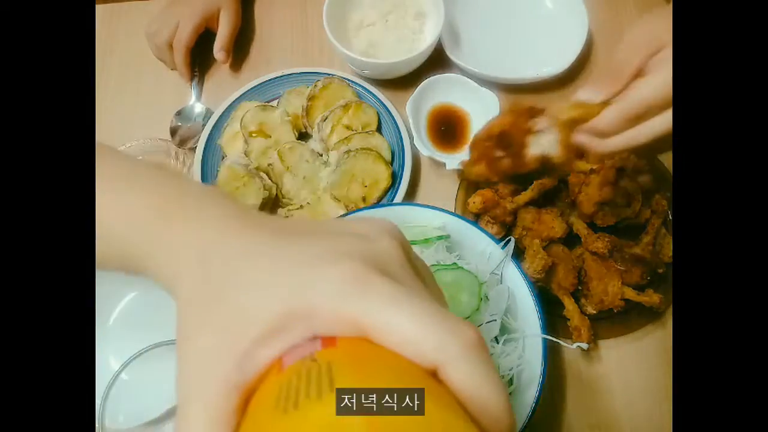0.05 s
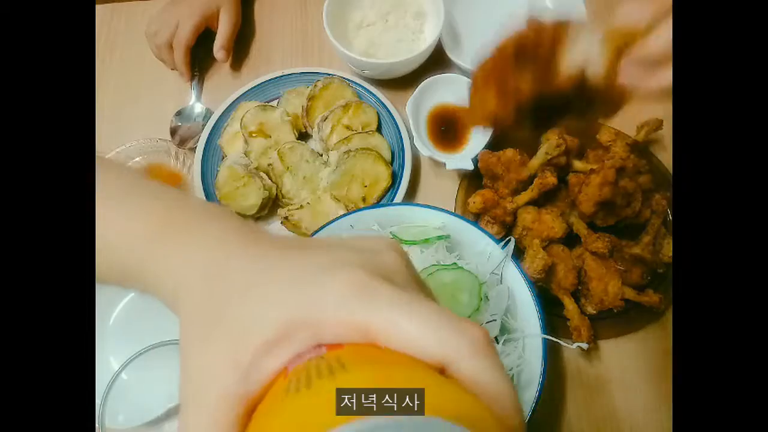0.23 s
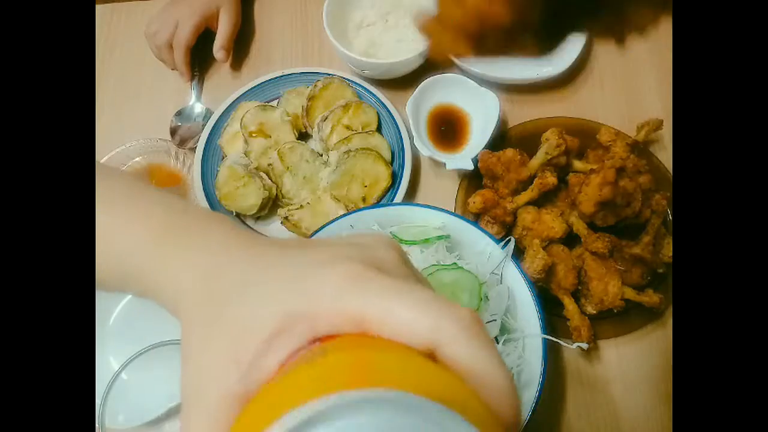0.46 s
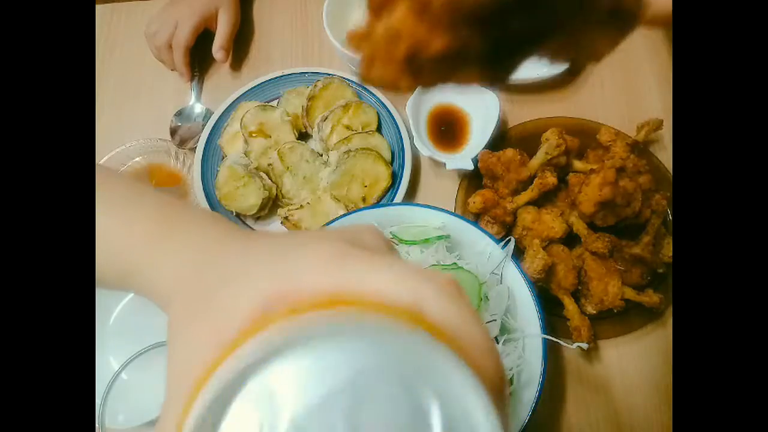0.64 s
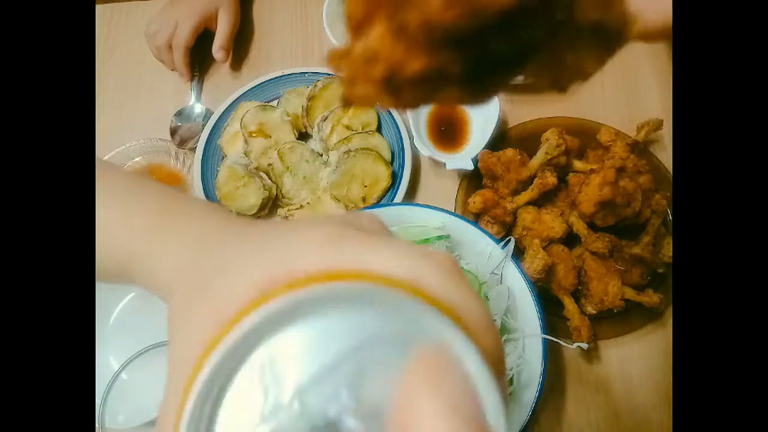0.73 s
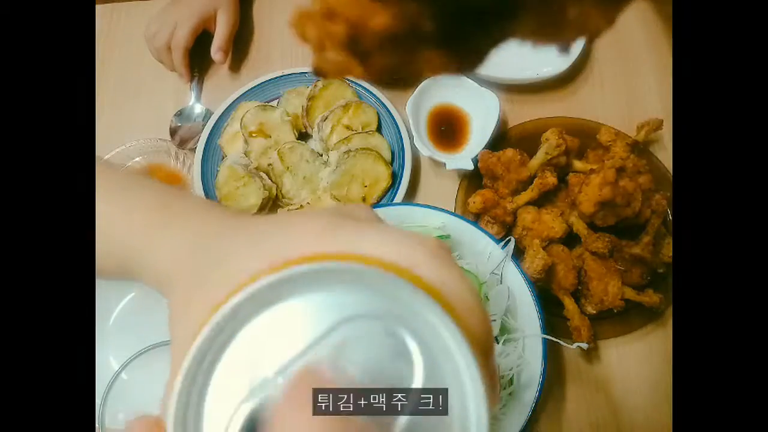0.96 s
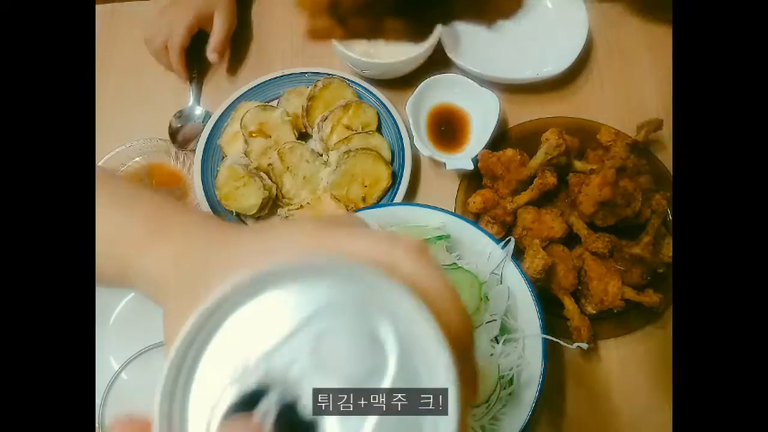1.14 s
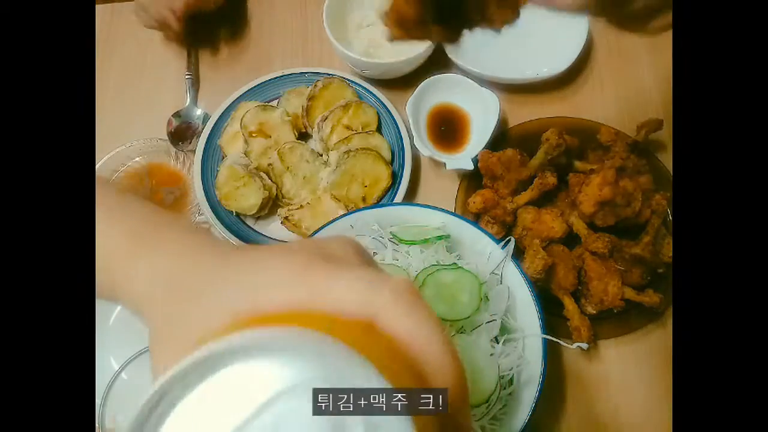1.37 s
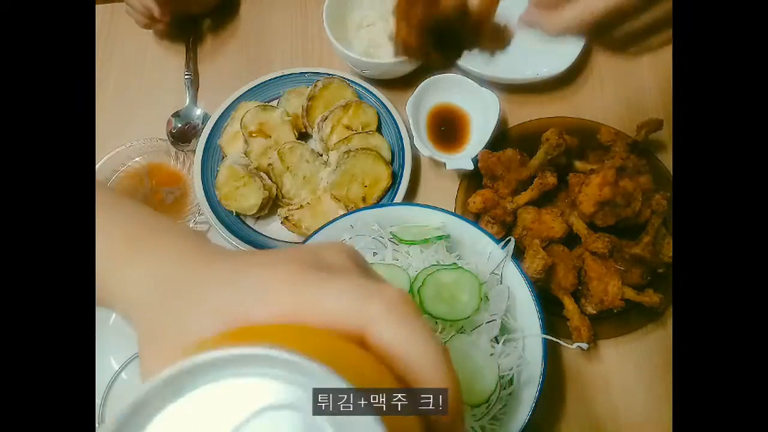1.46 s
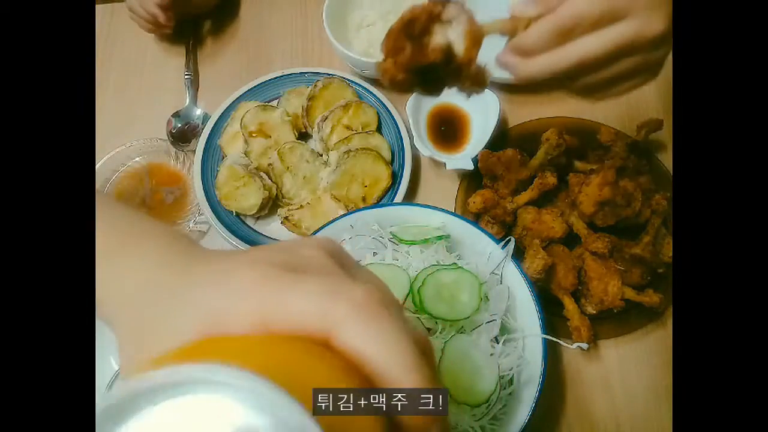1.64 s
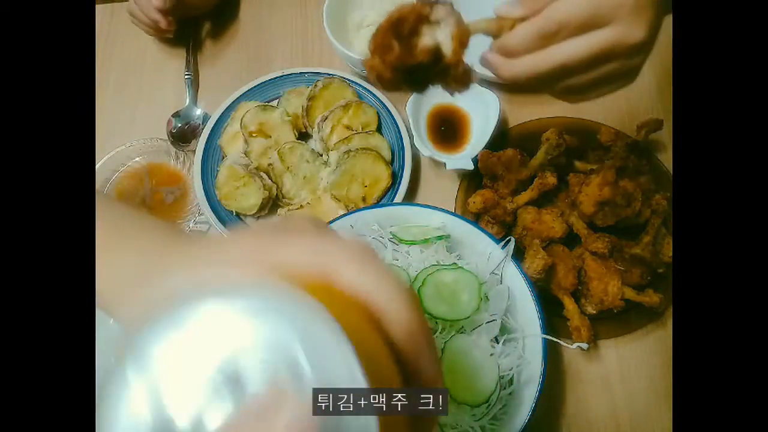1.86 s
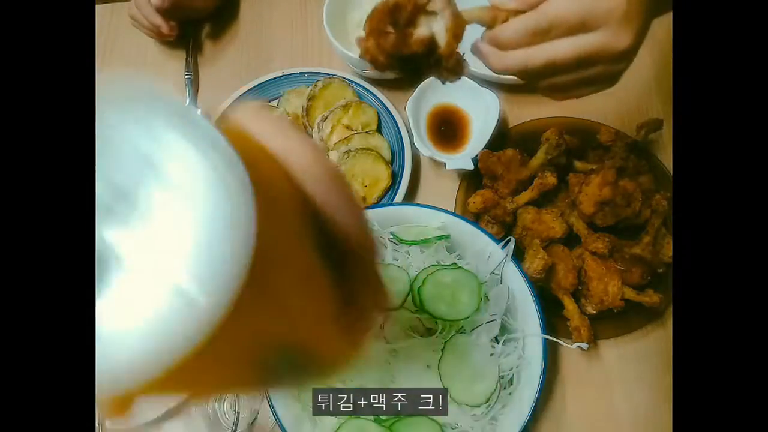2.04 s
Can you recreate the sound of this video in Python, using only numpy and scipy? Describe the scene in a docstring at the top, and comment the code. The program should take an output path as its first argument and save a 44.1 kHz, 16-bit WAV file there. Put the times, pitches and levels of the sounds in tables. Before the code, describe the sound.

In a small room with a low rumble, a drink can pops open close to the microphone and lets out a brief rush of gas. Its metal tab creaks, something hard clinks twice, and fingers softly rub the can.

```python
"""At a dinner table in a small, lively room, a drink can is opened beside the microphone.
The strained tab ticks, the lid cracks with a low thump, and gas rushes out as a turbulent jet.
The tab then creaks by stick-slip friction and snaps at its hinge, something hard clinks twice
in its natural modes, and fingers rub the can. Under it all lie a low rumble and an appliance hum."""
import sys
import numpy as np
from scipy import signal
from scipy.fft import rfft, irfft
from scipy.io import wavfile

SR = 44100
rng = np.random.default_rng(int(sys.argv[2]) if len(sys.argv) > 2 else 0)


def unload_wav(signal):
    """Save mono or channel-first audio to the path in sys.argv[1] as 16-bit WAV at rate SR, clipped to [-1, 1]."""
    wavfile.write(
        sys.argv[1],
        SR,
        np.round(np.clip(np.atleast_2d(signal).T, -1, 1) * 32767).astype(np.int16),
    )


N = 92610
T = np.arange(N) / SR

# Puffs of gas: start_s, hold_s, level_db, sag_db_per_s, release_db_per_s
GAS_PUFFS = [(0, 0.005, -44, 21.5, 212), (0.231, 0.12, -27.5, 18.5, 212)]
# Spectra as heard of the hiss, muffled above about 7.7 kHz, and the faint sizzle: frequency_hz, gain_db
HISS_SPECTRUM = [(100, -45), (380, -36), (600, -13), (1000, -6.5), (1400, -12.5), (2400, -7.5),
                 (4800, -7.5), (5600, -1.5), (7350, -1.5), (7850, -22), (10500, -26.5), (12500, -45.5),
                 (15500, -44.5)]
SIZZLE_SPECTRUM = [(5000, -30), (8000, 1), (9200, -8), (10200, 1.5), (12500, -15), (15200, -10),
                   (16000, -18.5)]
# Resonances of the lid and its opening: centre_hz, width_hz, boost_db
LID_RESONANCES = [(930, 130, 3), (2400, 400, 3), (2950, 250, -3), (3480, 200, 4), (4220, 130, 4),
                  (5330, 90, 4), (5600, 110, 3), (5850, 200, -2), (6120, 70, 4), (6620, 90, 3),
                  (6790, 90, -5), (7130, 180, 3)]
# Ticks of the strained tab and snaps of its hinge: start_s, level_db, decay_s
TAB_TICKS = [(.1923, -20.5, 0.0008), (0.1965, -32.5, 0.00054), (0.2007, -28, 0.0017),
             (0.21, -13.5, 0.00061), (0.2139, -25.5, 0.0043), (0.2213, -14, .0009), (0.2356, -24.5, .0006),
             (.2400, -22.5, .0005), (1.1930, -33, .0008)]
HINGE_SNAPS = [(1.0403, -26, 0.0013), (1.7773, -39, 0.0014)]
# Slips of the tab: start_s, scrape_db, decay_s, ring_db, pitch_hz
TAB_SLIPS = [(0.7503, -49, 0.0039, -37.5, 1073), (0.7557, -49, 0.0088, -30.5, 1110),
             (.8675, -62.5, 0.0053, -38, 1280), (1.023, -58, .002, -36, 1214),
             (1.0289, -60, .003, -34.5, 1130), (1.0348, -44.5, 0.016, -56, 1140),
             (1.0422, -37.5, 0.0043, -27.5, 1133), (1.056, -35, 0.0047, -29.5, 1136),
             (1.0665, -34.5, 0.01, -23, 1173), (1.0698, -34, 0.0044, -31, 1270),
             (1.0797, -41, 0.0016, -45, 1224), (1.192, -46, 0.0041, -31, 1265),
             (1.7709, -48.5, .001, -48, 1150), (1.7782, -49, 0.0052, -40, 1110),
             (1.8476, -55.5, .002, -70, 1147)]
# Hard contacts: start_s, knock_db, ring_db, rise_s, tilt_db_per_khz, favoured_hz, boost_db
IMPACTS = [(1.1988, -21, -27, .0003, 0, 1450, 3), (1.4065, -40, -37, .003, -1.7, 3270, 7)]
# Natural modes of the struck object: pitch_hz, level_db, t60_s
IMPACT_MODES = [(480, -19, .15), (915, -13, .25), (1190, -14, .18), (1448, -7, .15), (1916, -17, .2),
                (2342, -9, .17), (2480, -8, .12), (2950, -10, .14), (3140, -11, .14), (3257, -14, .18),
                (3601, -13, .15), (4490, -4, .11), (4945, -1, .13), (5319, -6, .12), (6169, -12, .15),
                (6982, -2, .09), (7138, -4, .15), (8100, -31, .28), (9400, -30, .17), (10500, -23, .085),
                (11900, -29, .11)]
# Finger movements: centre_s, spread_s, level_db, lower_resonance_hz, upper_resonance_hz
FINGER_RUBS = [(1.41, 0.016, -49.5, 2160, 3260), (1.46, 0.012, -61.5, 4600, 6600),
               (1.617, 0.0092, -52.5, 3910, 5400), (1.932, 0.0098, -54, 2500, 3490),
               (1.933, 0.0059, -55, 5900, 6200)]
# Spectra of the brief noises as heard: frequency_hz, gain_db
TICK_SPECTRUM = [(200, -28), (1200, -16.5), (2200, -3), (3100, -8), (4400, -8.5), (5250, 3), (6600, -3.5),
                 (8200, -22.5), (10000, -33), (14500, -25)]
CRACK_SPECTRUM = [(40, -25), (300, -6), (800, 0.5), (1200, -19), (2300, -1), (2900, -8.5), (3500, 0.5),
                  (4300, -10), (5300, 0), (6600, -7.5), (7300, 2.5), (8000, -23), (13500, -34.5),
                  (14800, -14), (16000, -19.5)]
SCRAPE_SPECTRUM = [(200, -8), (700, -31), (1300, -3), (2300, -5.5), (3150, 5.5), (4600, -5), (5800, 7.5),
                   (7000, -1.5), (8200, -16.5), (13500, -37), (15500, -19)]
SNAP_SPECTRUM = [(500, -17), (2400, -20), (3100, -11), (5000, -23), (6300, 10.5), (7400, -2), (8500, -27),
                 (11000, -18), (16000, -34)]
KNOCK_SPECTRUM = [(100, -22), (330, 0), (650, 5.5), (950, -4.5), (1400, 4.5), (1800, -8.5), (2500, 7.5),
                  (3900, -4), (5000, 11.5), (7200, -2), (8000, -16.5), (13000, -42), (15500, -46)]
RUB_SPECTRUM = [(300, -24), (2000, -2), (6900, -1), (8000, -22), (15000, -38)]
# Spectrum of the rumble as heard, muffled above about 7.7 kHz: frequency_hz, gain_db
RUMBLE_SPECTRUM = [(25, -19.5), (60, -10.5), (125, -2), (205, -0.5), (300, -9), (400, -11), (620, -13.5),
                   (1200, -14), (2200, -26.5), (3600, -33), (5500, -28), (6700, -28), (8100, -47.5),
                   (13500, -51), (15200, -36.5), (16000, -41.5)]
# Envelope of the rumble: time_s, level_db
RUMBLE_ENVELOPE = [(0, -56.5), (.35, -55.5), (.5, -54.5), (.6, -54), (.75, -54), (.95, -56.5), (1.13, -53),
                   (1.35, -53), (1.53, -52.5), (1.72, -55.5), (1.9, -54), (2.1, -57)]
# Partials of the appliance hum: pitch_hz, level_db
HUM_PARTIALS = [(120, -76.5), (204, -69.5), (360, -65.5)]
# Decay time of the reverberation as heard, the highest treble dying quickly: frequency_hz, t60_s
DECAY_TIMES = [(100, .3), (500, .5), (2000, .56), (5000, .5), (7200, .44), (8500, .3), (15000, .26)]

CRACK_S = .2259


def gas_jet(rise_s=.0021, arch_db=4, sputter_db=.5):
    """Turbulence in the opening radiates noise that swells, then sags and dulls as pressure is spent."""
    flow = 0
    for start_s, hold_s, level_db, sag_db_per_s, release_db_per_s in GAS_PUFFS:
        t = since(start_s)
        arch = np.sin(np.pi * np.minimum(t / hold_s, 1)) ** 2
        loss_db = sag_db_per_s * t + release_db_per_s * since(start_s + hold_s)
        flow += np.minimum(t / rise_s, 1) * amp(level_db + arch_db * arch - loss_db)
    hiss, sizzle = flow * amp(sputter_db * drift(hz=220)) * rng.standard_normal((2, N))
    sizzle *= amp(-24) * (flow / flow.max()) ** .3  # fades faster than the flow
    return colour(hiss, HISS_SPECTRUM, LID_RESONANCES) + colour(sizzle, SIZZLE_SPECTRUM)


def lid_fracture():
    """Strain is released in ticks of the tab; then the score tears and excites the lid's resonances."""
    ticks = sum(amp(level_db) * burst(start_s, decay_s) for start_s, level_db, decay_s in TAB_TICKS)
    crack = amp(-6.5) * burst(CRACK_S, decay_s=.0022, hold_s=.0013)
    return colour(ticks, TICK_SPECTRUM) + colour(crack, CRACK_SPECTRUM, LID_RESONANCES)


def lid_thump(pitch_hz=106, decay_s=.0041, low_cut_hz=61):
    """The springing lid displaces air: a near-field pulse at the microphone, with no reverberation."""
    t = since(CRACK_S)
    pulse = amp(-15) * np.sin(2 * np.pi * pitch_hz * t) * np.exp(-t / decay_s)
    return signal.sosfilt(signal.butter(3, low_cut_hz, "high", fs=SR, output="sos"), pulse)


def tab_creaks(ring_rise_s=.0012, ring_decay_s=.0043):
    """Stick-slip friction: each slip of the tab scrapes the lid and excites a damped, hollow ring."""
    scrape, ring = 0, 0
    for start_s, scrape_db, decay_s, ring_db, pitch_hz in TAB_SLIPS:
        t = since(start_s)
        scrape += amp(scrape_db) * burst(start_s, decay_s)
        envelope = (1 - np.exp(-t / ring_rise_s)) * np.exp(-t / ring_decay_s)
        ring += amp(ring_db) * envelope * np.sin(2 * np.pi * pitch_hz * t)
    return colour(scrape, SCRAPE_SPECTRUM) + ring


def hinge_snaps():
    """Sudden yielding of the tab's hinge radiates thin, bright transients."""
    snaps = sum(amp(level_db) * burst(start_s, decay_s) for start_s, level_db, decay_s in HINGE_SNAPS)
    return colour(snaps, SNAP_SPECTRUM)


def clinks(tilt_from_hz=410, favour_width_hz=260, waver_db=2.5):
    """Impact excites a knock and damped modes; softer contact is duller, and each spot favours some."""
    sound = 0
    for start_s, knock_db, ring_db, rise_s, tilt_db_per_khz, favoured_hz, boost_db in IMPACTS:
        t = since(start_s)
        onset = 1 - np.exp(-t / rise_s)
        tilt_db = lambda hz: tilt_db_per_khz * max(hz - tilt_from_hz, 0) / 1000
        spectrum = [(hz, gain_db + tilt_db(hz)) for hz, gain_db in KNOCK_SPECTRUM]
        knock = colour(onset * burst(start_s, decay_s=.014), spectrum)
        ring = 0
        for pitch_hz, level_db, t60_s in IMPACT_MODES:
            favour_db = boost_db * np.exp(-((pitch_hz - favoured_hz) / favour_width_hz) ** 2)
            envelope = amp(level_db + tilt_db(pitch_hz) + favour_db - 60 * t / t60_s)
            ring += envelope * np.sin(2 * np.pi * (pitch_hz * t + rng.random()))
        sound += amp(knock_db) * knock + amp(ring_db + waver_db * drift(hz=150)) * onset * ring
    return sound


def finger_rubs(width_hz=550, boost_db=17.5):
    """Sliding friction of skin on the can makes grainy swishes, each shaped by two resonances."""
    sound = 0
    for centre_s, spread_s, level_db, lower_hz, upper_hz in FINGER_RUBS:
        grains = unit(rng.standard_normal(N) * (rng.random(N) < .1))
        envelope = np.exp(-.5 * ((T - centre_s) / spread_s) ** 2)
        resonances = [(hz, width_hz, boost_db) for hz in (lower_hz, upper_hz)]
        sound += amp(level_db) * colour(grains * envelope, RUB_SPECTRUM, resonances)
    return sound


def room_tone(waver_db=3.5, waver_rad=.23):
    """Ambient noise: a broadband rumble and an appliance hum modulated in amplitude and phase."""
    envelope = amp(np.interp(T, *np.transpose(RUMBLE_ENVELOPE)))
    rumble = envelope * colour(rng.standard_normal(N), RUMBLE_SPECTRUM)
    hum = 0
    for pitch_hz, level_db in HUM_PARTIALS:
        gain = amp(level_db + waver_db * drift(hz=12))
        hum += gain * unit(np.sin(2 * np.pi * pitch_hz * T + waver_rad * drift(hz=4.4)))
    return rumble + hum


def in_room(direct, wet_db, delay_s=.0035):
    """Reverberation: diffuse reflections follow the direct sound, each band decaying at its own rate."""
    reflections = rng.standard_normal(SR) * (T[:SR] > delay_s)
    hz, t, bands = signal.stft(reflections, SR, nperseg=256)
    decay = amp(-60 * t / value_at(DECAY_TIMES, hz)[:, None])
    tail = signal.istft(bands * decay, SR, nperseg=256)[1]
    return direct + amp(wet_db) * signal.fftconvolve(direct, tail / np.linalg.norm(tail))[:N]


def colour(excitation, spectrum, resonances=(), size=4096):
    """Source-filter shaping: a minimum-phase filter of unit energy imposes a spectrum and resonances."""
    hz = np.fft.rfftfreq(size, 1 / SR)
    peaks_db = sum(boost_db / (1 + (2 * (hz - centre_hz) / width_hz) ** 2)
                   for centre_hz, width_hz, boost_db in resonances)
    gain_db = value_at(spectrum, hz) + peaks_db
    log_gain = np.log(amp(np.r_[gain_db, gain_db[-2:0:-1]]))
    response = np.exp(np.conj(signal.hilbert(log_gain)))
    taps = np.fft.ifft(response).real[:size // 2]
    return signal.oaconvolve(excitation, taps / np.linalg.norm(taps))[:N]


def burst(start_s, decay_s, hold_s=0):
    """Impulsive excitation: dense clicks of random sign start at once and decay exponentially."""
    return rng.choice([-1., 1.], N) * (T >= start_s) * np.exp(-since(start_s + hold_s) / decay_s)


def drift(hz):
    """Random modulation: noise low-passed near hz, at unit rms."""
    low_pass = np.exp(-(np.fft.rfftfreq(N, 1 / SR) / hz) ** 2)
    return unit(irfft(rfft(rng.standard_normal(N)) * low_pass, N))


def value_at(table, hz):
    """Interpolation on a logarithmic frequency axis."""
    table_hz, values = np.transpose(table)
    return np.interp(np.log(hz + 1), np.log(table_hz + 1), values)


def since(start_s):
    """Seconds elapsed since an onset, zero before it."""
    return np.maximum(T - start_s, 0)


def amp(db):
    """Amplitude ratio of a level in decibels."""
    return 10 ** (np.asarray(db) / 20)


def unit(x):
    """Normalisation to unit rms."""
    return x / np.sqrt(np.mean(x ** 2) + 1e-20)


def scene():
    """Superposition: the sources and their reverberation add in one channel."""
    lid = in_room(lid_fracture() + hinge_snaps(), wet_db=-16) + lid_thump()
    gas = in_room(gas_jet(), wet_db=-13)
    friction = in_room(tab_creaks() + finger_rubs(), wet_db=-13.5)
    impacts = in_room(clinks(), wet_db=-18)
    return (lid + gas + friction + impacts + room_tone())[None]


def record(dry, ceiling=.72, cutoff_hz=16300):
    """Soft saturation: the crack overloads the microphone; a low-pass filter then limits the band."""
    saturated = dry / (1 + (dry / ceiling) ** 4) ** (1 / 4)
    low_pass = signal.firwin(255, cutoff_hz, window=("kaiser", 8), fs=SR)
    return signal.oaconvolve(saturated, low_pass[None], "same")


dry = scene()
out = record(dry)
unload_wav(out)
```